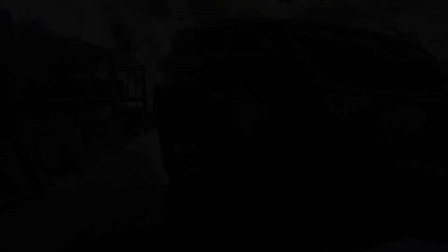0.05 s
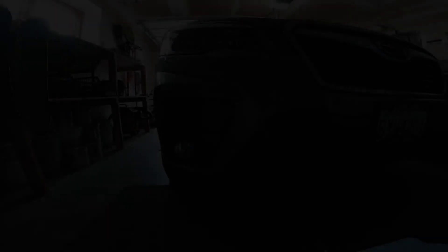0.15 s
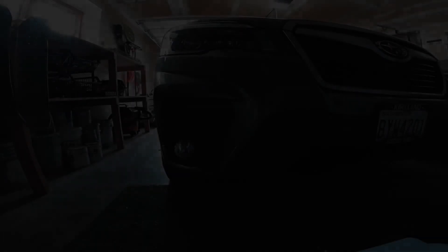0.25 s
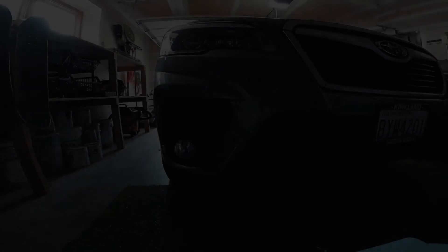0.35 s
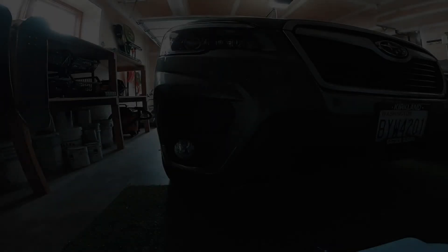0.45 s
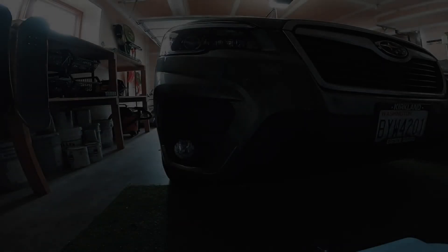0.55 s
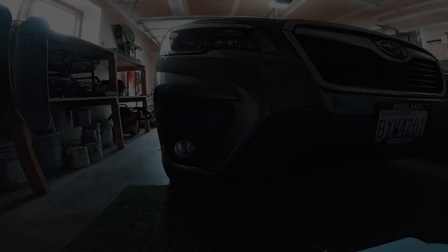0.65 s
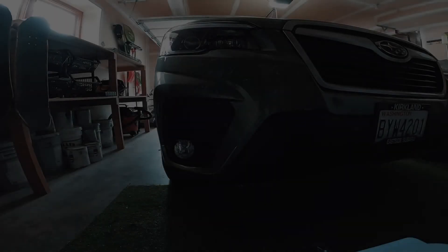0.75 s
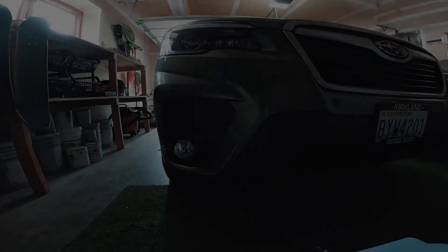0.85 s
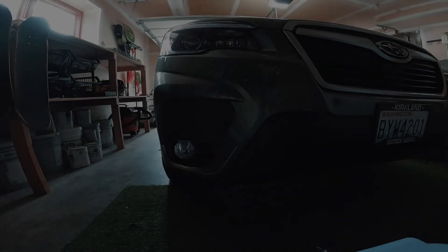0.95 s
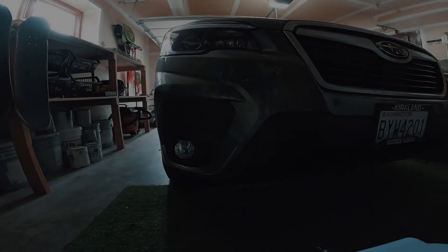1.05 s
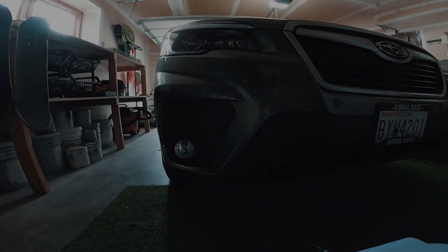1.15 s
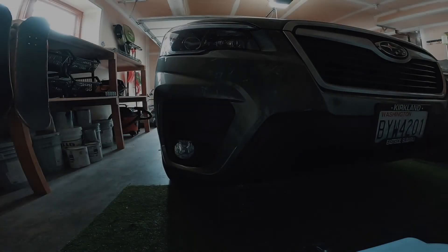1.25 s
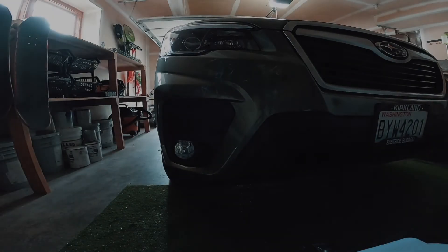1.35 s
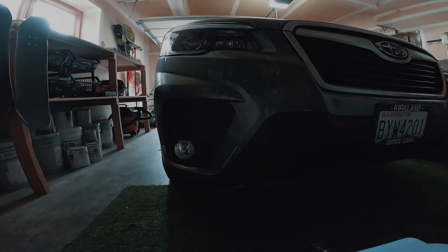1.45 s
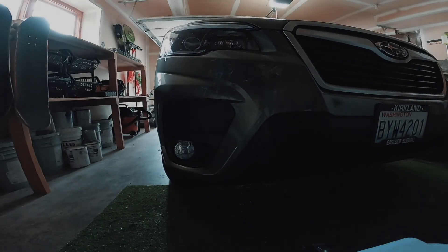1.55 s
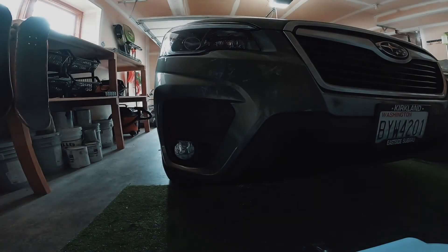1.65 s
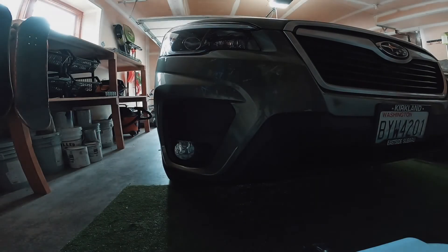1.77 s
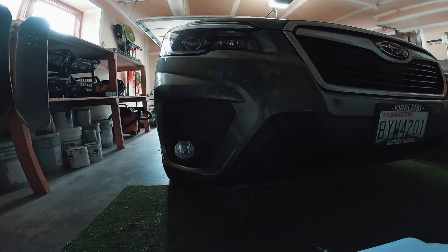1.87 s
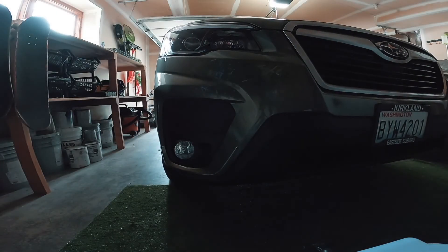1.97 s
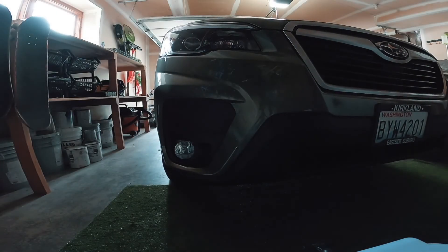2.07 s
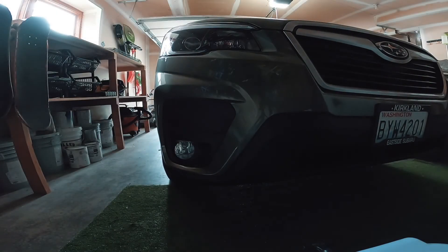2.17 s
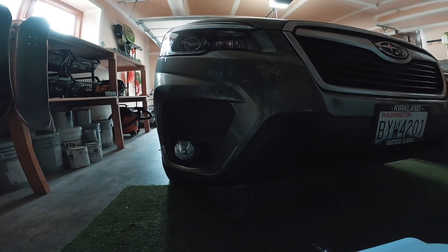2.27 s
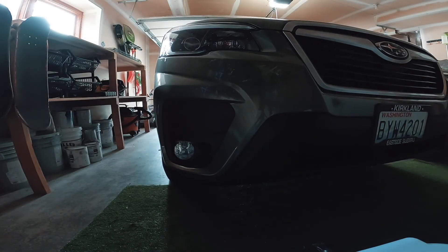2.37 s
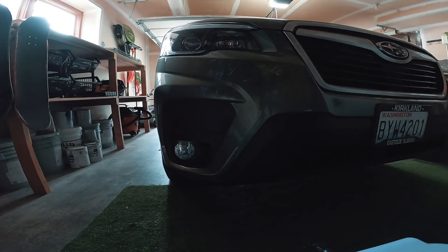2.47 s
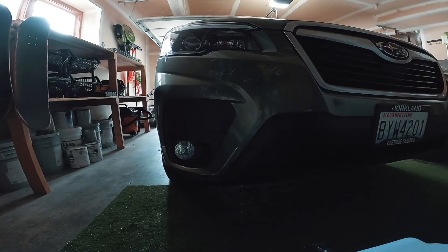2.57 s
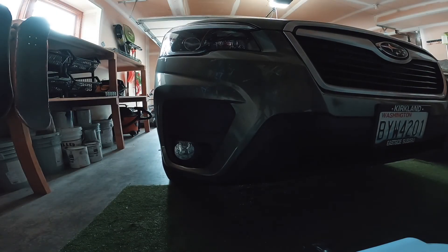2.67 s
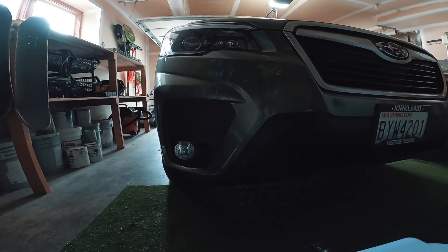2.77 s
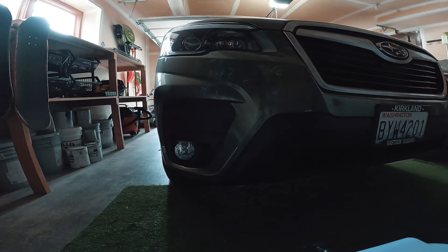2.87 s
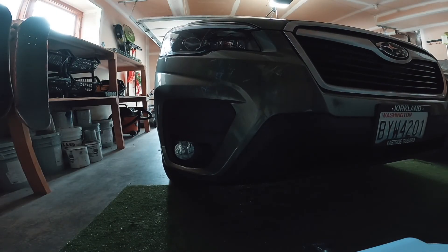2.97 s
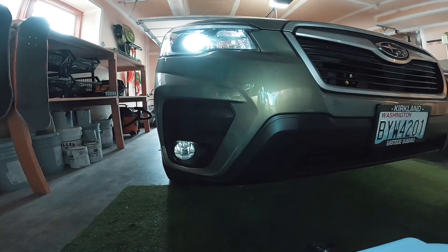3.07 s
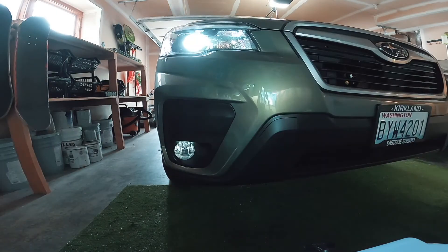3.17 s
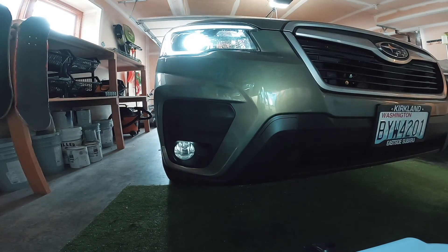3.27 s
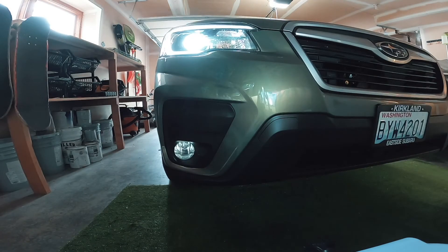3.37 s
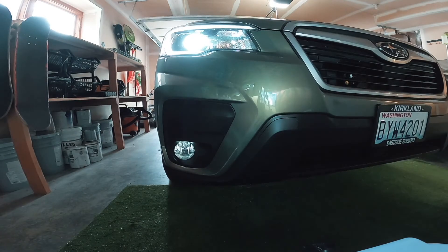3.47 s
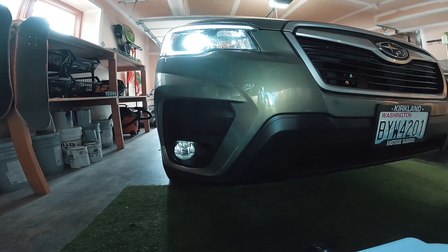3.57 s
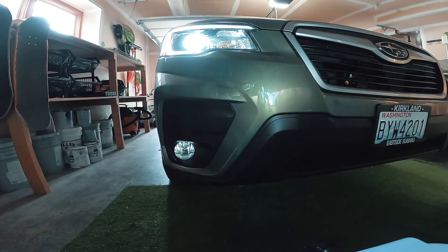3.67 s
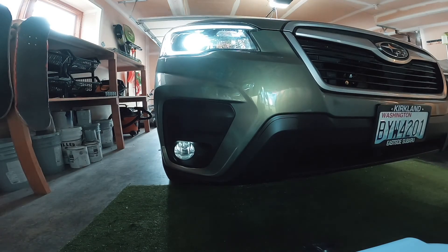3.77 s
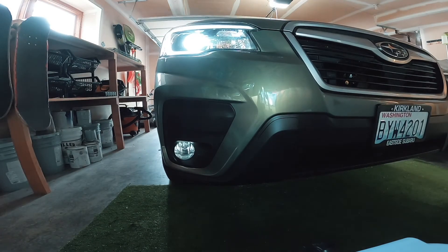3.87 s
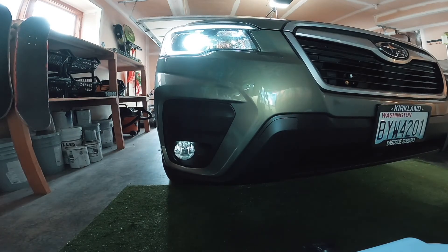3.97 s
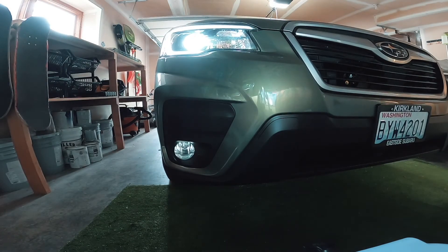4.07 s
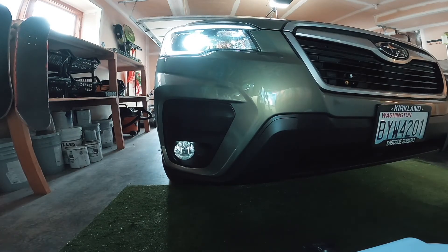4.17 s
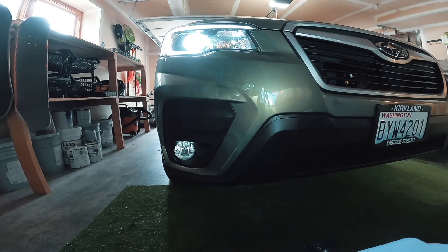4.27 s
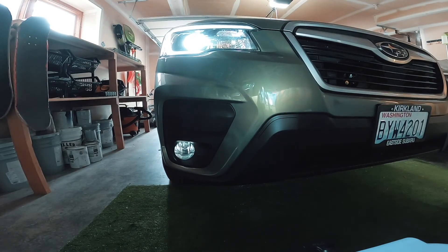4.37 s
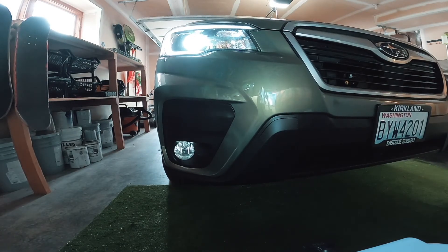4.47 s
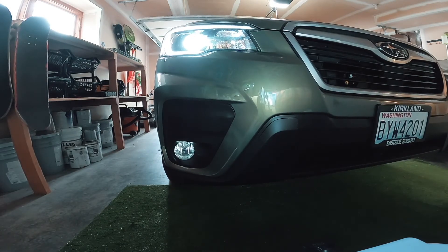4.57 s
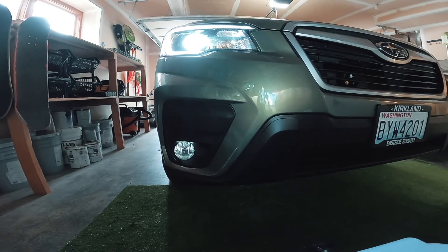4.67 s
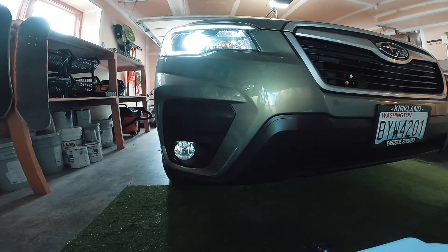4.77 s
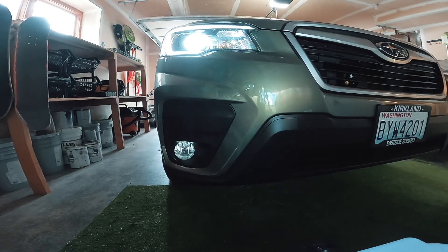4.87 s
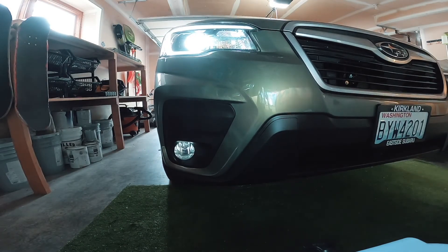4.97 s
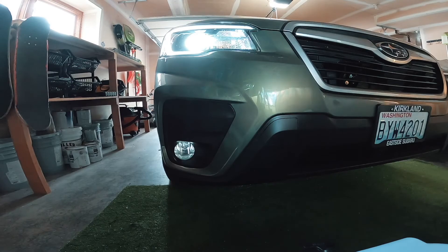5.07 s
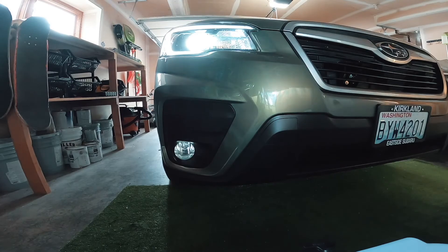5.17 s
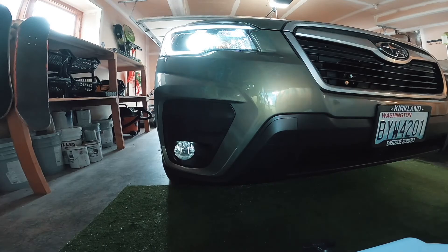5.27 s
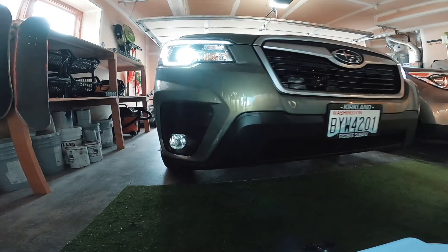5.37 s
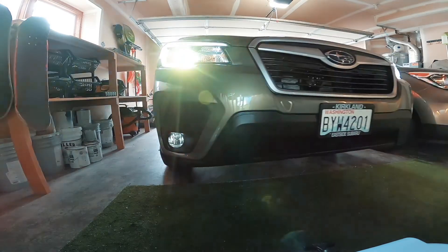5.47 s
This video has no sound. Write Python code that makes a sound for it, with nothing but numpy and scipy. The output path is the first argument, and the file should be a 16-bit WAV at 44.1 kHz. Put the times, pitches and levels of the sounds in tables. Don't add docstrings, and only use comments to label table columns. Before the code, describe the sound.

Small hard-walled garage, stereo microphone low by the bumper. Quiet rumble rises from silence; a door clunks open, seat knocks and deep body thumps follow, then a booming door slam. After a pause, ticking relays and a faint servo buzz, four grinding starter heaves, an engine roaring up and settling, and a sudden change to a low idle throb.

```python
import sys
import numpy as np
from scipy import signal
from scipy.fft import rfft, irfft, next_fast_len
from scipy.io import wavfile
from scipy.ndimage import uniform_filter1d

SR = 44100
rng = np.random.default_rng(int(sys.argv[2]) if len(sys.argv) > 2 else 0)


def put_to_file(sound):
    columns = np.atleast_2d(sound).T
    safe = np.clip(columns, -1, 1)
    whole_steps = np.round(safe * 32767)
    wavfile.write(sys.argv[1], SR, whole_steps.astype(np.int16))


def volts_from_decibels(level):
    exponent = np.asarray(level, float) / 20
    return 10 ** exponent


N = 243873
T = np.arange(N) / SR


def unit(x):
    return x / np.sqrt(np.mean(x ** 2))


def levelled(x, samples):
    return x / np.sqrt(uniform_filter1d(x ** 2, size=samples))


def colour(x, points, scale=1):
    hz, db = np.transpose(points)
    size = next_fast_len(len(x) + SR // 4, real=True)
    f = np.maximum(np.arange(size // 2 + 1) * SR / size, 1)
    gain = volts_from_decibels(scale * np.interp(np.log(f), np.log(hz), db))
    return irfft(rfft(x, size) * gain, size)[:len(x)]


def white():
    return rng.standard_normal(N)


def noise(points):
    return unit(colour(white(), points))


def band(x, hz, kind):
    return signal.sosfilt(signal.butter(3, hz, kind, fs=SR, output="sos"), x)


def treble(x, hz):
    return band(x, hz, "high")


def ring(x, hz, width_hz):
    return signal.lfilter(*signal.iirpeak(hz, hz / max(width_hz, 2), SR), x)


def body(x, peaks):
    return sum((-1) ** k * volts_from_decibels(db) * ring(x, hz, w) for k, (hz, w, db) in enumerate(peaks))


def walk(rate):
    k = int(SR / rate)
    steps = np.repeat(rng.standard_normal(N // k + 1), k)
    return 1.293 * uniform_filter1d(uniform_filter1d(steps, k), k)[:N]


def tone(hz):
    return np.sqrt(2) * np.sin(2 * np.pi * np.cumsum(hz * np.ones(N)) / SR)


def blow(s, length_s, rise_s=0.0013):
    t = np.maximum(T - s, 0)
    return (1 - np.exp(-t / rise_s)) * np.exp(-t / max(length_s, 1e-4)) + 1e-12


def swell(s, db, rise, fall):
    return db - np.where(T < s, rise * (s - T), fall * (T - s))


def loudest(rows):
    return np.max([swell(*row) for row in rows], axis=0)


def running(start_s, stop_s):
    return uniform_filter1d(((T > start_s) & (T < stop_s)) * 1., size=200)


def garage(x, t60_s, wet_db):
    t = T[:SR // 2]
    decay = np.exp(-np.log(1000) * t / t60_s)
    tail = unit(rng.standard_normal(len(t)) * decay) / np.sqrt(len(t)) * volts_from_decibels(wet_db)
    tail[0] = 1
    return signal.fftconvolve(x, tail)[:N] / np.sqrt(1 + volts_from_decibels(wet_db) ** 2)


# (frequency [Hz], density [dB per Hz])
RUMBLE = [(12, -44.5), (20, -42), (37, -6), (58, -11.5), (81, -2.5), (114, -1.5), (151, -12), (247, -12),
          (364, -27.5), (490, -32.5), (700, -51), (910, -74.5), (1540, -120)]
# (frequency [Hz], density [dB per Hz])
HISS = [(290, -21), (500, -4), (627, -9.5), (829, -14.5), (1030, -3), (1070, -6), (1370, -11), (2670, -19),
        (5190, -23.5), (8380, -30.5), (12000, -66), (15600, -85), (22000, -120)]
# (time [s], rumble level [dB])
GAIN = [(0.05, -91), (0.2, -72), (0.4, -61), (0.75, -54.5), (1.06, -53), (1.25, -47), (1.72, -42),
        (2.45, -43.5), (2.58, -50), (3.06, -52.5), (3.1, -45), (3.9, -44.5)]
# (peak time [s], level beside rumble [dB], rise [dB/s], fall [dB/s])
RUSTLES = [
    (.74, -17, 150, 60),
    (0.915, -11, 70, 80),
    (1.61, -20, 121, 70),
    (2.38, -17.5, 100, 130),
    (3.33, -18, 41, 38),
]


def air():
    gain_db = np.interp(T, *np.transpose(GAIN))
    rumble = noise(RUMBLE) * volts_from_decibels(gain_db + 3.25 * walk(7.08) + 1.5)
    hum = tone(51.9 * (1 + 0.0068 * walk(4.42))) * volts_from_decibels(gain_db + 1 + 3.2 * walk(16))
    hiss = noise(HISS)
    rustle = volts_from_decibels(gain_db + loudest(RUSTLES)) * (.25 * hiss + 1.7 * ring(hiss, 1400, 600))
    hiss = hiss * volts_from_decibels(gain_db - 28.5) + rustle
    return (T > .06) * (rumble + hiss * volts_from_decibels(0.88 * walk(6.6) + 3.0) + hum)


# (peak time [s], pitch [Hz], boom level [dB], boom fall [dB/s], panel thud level [dB])
LOADS = [(1.052, 36.09, -24.5, 3, -20.5), (1.24, 38.94, -27, 68, -38.5), (1.58, 35.84, -29.5, 49, -23),
         (1.65, 36.8, -21.5, 280, -33), (1.76, 39.9, -28, 36, -29), (2.04, 40, -36.5, 81, -35),
         (2.2, 40.95, -39.5, 300, -31.5), (2.359, 30.1, -12.5, 300, -9), (2.42, 29.3, -16, 97, -14.5),
         (2.68, 28.3, -35, 150, -48), (2.85, 24, -44, 100, -49)]
# (frequency [Hz], width [Hz], gain [dB])
PANELS = [(54.5, 15, -2.5), (101, 24.7, -3.5), (130, 21.5, -6.5), (155, 37, -17.5)]
# (peak time [s], level [dB], rise [dB/s], fall [dB/s])
CABIN = [(2.43, -21, 130, 130)]


def boom():
    load_rise, choke_s = 397.5, 0.059
    s, hz, peak_db, fall, thud_db = np.transpose(LOADS)
    chokes = np.append(s[1:] - choke_s, T[-1])
    swings = [swell(a, p, load_rise, f) - load_rise * np.maximum(T - c, 0)
              for a, p, f, c in zip(s, peak_db, fall, chokes)]
    boom_db = np.max(swings, axis=0)
    hz = uniform_filter1d(hz[np.searchsorted(chokes[:-1], T)], size=3000)
    thud_db = loudest([(a, p, 547.5, 119) for a, p in zip(s, thud_db)])
    thud = levelled(unit(body(white(), PANELS)), 2500)
    cabin = tone(55.4) * volts_from_decibels(loudest(CABIN))
    return tone(hz) * volts_from_decibels(boom_db) + thud * volts_from_decibels(thud_db - 5.0) + cabin


# (time [s], peak level [dB], brightness [dB], depth [dB], panel pitch [Hz])
KNOCKS = [(1.028, -28, -7, 3.5, 202), (1.042, -42, -27, 4.5, 240), (1.058, -38, -12, 0, 245),
          (1.074, -38, -9, 4.5, 245), (1.381, -58.5, -9, 3, 283), (1.512, -61.5, -1.5, 0, 235),
          (1.56, -35, -5, -1.5, 219), (1.585, -38, -6, -6, 300), (1.598, -35, -10, -13, 307),
          (1.625, -43, -8, -6, 300), (1.735, -42.5, -16, -6, 460), (1.747, -44, -21, 12, 300),
          (1.99, -50.5, -13.5, 13.5, 213), (2.004, -50, -11, 10.5, 400), (2.03, -57.5, -8, 13.5, 236),
          (2.2, -43.5, -17, 6, 223), (2.29, -40, -24, -9, 202), (2.296, -28, -19, -22, 237),
          (2.302, -22, -21, -26, 300), (2.313, -29, -18, -14, 300), (2.323, -15.5, -19, -3, 400),
          (2.336, -22, -15, -5, 420), (2.349, -22, -15, 4, 440), (2.385, -31, -14, 2, 250)]
# (frequency [Hz], density [dB per Hz])
DOOR = [(88, -40.5), (150, 10.5), (185, -27), (260, 3), (303, -13), (434, -5), (588, -20), (767, -20),
        (910, -16.5), (1280, -23.5), (1640, -25.5), (4400, -41.5), (8390, -57.5), (14000, -83.5)]
# (frequency [Hz], width [Hz], gain [dB])
SHELL = [(54.6, 7.1, 2.5), (111.5, 23, -2.5), (134.6, 13, -0.5), (240, 23, -7), (291, 22, -13.5),
         (465.6, 26, -12)]
# (time [s], peak level [dB], half width [s])
LATCH = (2.329, -9.5, .002)


def door():
    metal, rattle, shoves = noise(DOOR), np.zeros((3, N)), np.zeros(N)
    deep = unit(band(metal, 423, "low"))
    bright = unit(treble(metal, 2440))
    middle = unit(band(treble(metal, 552), 2130, "low"))
    middle = unit(middle + .6 * ring(middle, 1170, 300))
    for k, (s, db, bright_db, depth_db, hz) in enumerate(KNOCKS):
        panel = 0.63 * deep + 0.96 * ring(deep, hz, 110)
        sound = middle + panel * volts_from_decibels(depth_db) + bright * volts_from_decibels(bright_db + 2.0)
        rattle[k % 3] += volts_from_decibels(db + 4) * blow(s + 0.0029, 0.0092, 0.0046) * sound
        shoves[int((s + .0035) * SR)] = volts_from_decibels(db + depth_db + 49)
    echoes = sum(garage(part, 0.36, 3.8) for part in rattle)
    shell = body(band(shoves + 1e-12 * metal, 700, "low"), SHELL)
    latch_s, latch_db, half_width_s = LATCH
    return echoes + shell + volts_from_decibels(latch_db) * np.exp(-np.abs(T - latch_s) / half_width_s)


# (time [s], peak level [dB], ring pitch [Hz], brightness [dB])
RELAYS = [(3.077, -47, 1100, -14), (3.083, -62, 4650, -25), (3.08, -49, 1350, -25), (3.132, -46.5, 1260, 2),
          (3.145, -51, 1370, -10), (3.137, -52, 3000, -20), (3.16, -53.5, 2880, -20),
          (3.178, -52, 1800, -25), (3.175, -50, 1270, -36), (3.192, -50, 1300, -30),
          (3.216, -48.5, 3300, -24), (3.225, -50, 1150, -25), (3.27, -54, 3200, -25),
          (3.246, -41, 1240, -24), (3.275, -51, 1000, -20), (3.312, -44.5, 1300, 0.5),
          (3.323, -38, 1340, -12), (3.34, -49, 2300, -20), (3.365, -38, 1440, -9), (3.371, -38, 1480, -22),
          (3.368, -46, 2800, -22), (3.37, -55, 4500, -20), (3.386, -39.5, 1000, -14),
          (3.398, -48, 2300, -20), (3.41, -47, 1000, -44)]


def relays():
    out, hiss = 0, white()
    for s, db, hz, bright_db in RELAYS:
        snap = hiss * blow(s, 0.0059, 0.0023)
        armature, box = 5.2 * ring(snap, hz, hz / 9), 1.4 * ring(snap, 1030, 1350)
        out = out + volts_from_decibels(db + 3.0) * (armature + box + volts_from_decibels(bright_db) * treble(snap, 3800))
    return band(out, 5500, "low")


# (peak time [s], level [dB], rise [dB/s], fall [dB/s])
SPIN_UP = [(3.43, -52, 480, 150), (3.51, -55, 50, 300), (3.452, -51, 300, 215)]
# (peak time [s], level [dB], rise [dB/s], fall [dB/s])
SETTLE = [(3.5, -59, 110, 60)]


def servos():
    coil_hz, coil_db = 1000, -65.5
    db, third_db = loudest(SPIN_UP), loudest(SETTLE)
    hiss = white()
    upper = ring(hiss, 2290, 200) + .3 * ring(hiss, 4430, 80)
    upper = upper + .15 * ring(hiss, 3850, 60) + .1 * ring(hiss, 5580, 60)
    upper = volts_from_decibels(db - 4.5) * unit(upper)
    third = volts_from_decibels(third_db - 2.5) * unit(ring(hiss, 3303, 14) + 0.52 * ring(hiss, 3410, 40))
    squeal = volts_from_decibels(db - 24) * unit(ring(hiss, 7900, 90) + .7 * ring(hiss, 9200, 120))
    buzz = volts_from_decibels(coil_db - 5.5) * unit(band(treble(hiss, 1500), 4800, "low"))
    coil = volts_from_decibels(coil_db) * (tone(coil_hz) + volts_from_decibels(-17) * tone(2 * coil_hz))
    motor = volts_from_decibels(db - 6.0) * tone(1095) + band(upper + third, 6500, "low") + squeal
    return running(3.4, 3.895) * (motor + buzz + coil)


# (centre time [s], length [s], pitch
# [Hz], level [dB])
WHINES = [(3.917, 0.022, 1440, -30), (3.935, 0.034, 1310, -26), (3.955, 0.031, 1180, -30),
          (3.94, 0.029, 950, -29.5), (3.93, 0.015, 3220, -28.5), (3.995, 0.052, 2510, -32),
          (4.015, 0.051, 280, -32.5), (4.01, 0.04, 980, -32.5), (3.997, 0.062, 495, -34.5),
          (4.097, 0.1, 2730, -36.5), (4.12, 0.07, 495, -34), (4.153, 0.0695, 970, -31),
          (4.18, 0.03, 1000, -36), (4.16, 0.035, 1370, -39), (4.085, .06, 1010, -37),
          (4.17, 0.047, 2480, -35), (4.18, 0.06, 3090, -40), (4.06, .04, 3260, -42),
          (4.19, 0.039, 2310, -38.5), (4.197, 0.04, 454, -34.5), (4.296, 0.02, 965, -28.5),
          (4.3, .03, 2465, -36), (4.3, 0.022, 2700, -39.5), (4.355, 0.039, 1170, -36.5),
          (4.34, .04, 2600, -40.5), (4.32, 0.025, 990, -28), (4.29, 0.015, 1720, -35),
          (4.303, 0.025, 2030, -34), (4.286, 0.015, 480, -33.5), (4.44, 0.0365, 480, -27),
          (4.06, .07, 480, -36), (4.465, 0.0405, 1005, -35), (4.485, 0.025, 3100, -37),
          (4.46, 0.04, 1300, -39), (4.5, .03, 3975, -36), (4.54, 0.036, 1830, -36),
          (4.545, 0.048, 2970, -35.5), (4.61, 0.04, 3250, -37), (4.58, .03, 2070, -34.5),
          (4.6, .06, 2900, -37.5), (4.62, .03, 912, -38), (4.435, .02, 900, -29), (4.427, .015, 2950, -33),
          (4.63, .03, 400, -33),
          (4.097, .04, 5570, -35), (4.1, .04, 6950, -42), (4.45, .02, 5570, -39), (4.607, .02, 8200, -43),
           (4.06, .015, 4800, -36), (4.06, .02, 5660, -41), (4.083, .015, 4200, -39),
           (4.11, .02, 4280, -42), (4.135, .02, 4150, -40), (4.155, .03, 5620, -43), (4.06, .02, 7950, -46),
           (4.09, .025, 7900, -45), (4.13, .03, 7850, -44), (4.11, .05, 8330, -47),
           (3.978, .015, 8220, -42), (3.96, .015, 4200, -37), (4.125, .015, 5500, -40),
           (4.135, .015, 6900, -44)]


def whines():
    out = np.zeros(N)
    wobble_s = np.cumsum(1 + 0.00621 * walk(90)) / SR
    flutter = volts_from_decibels(4.2 * walk(109.7))
    for s, length, hz, db in WHINES:
        at = slice(int((s - 2 * length) * SR), int((s + 2 * length) * SR))
        own_flutter = flutter[int(hz * 9):][:len(T[at])]
        dull_db = -2.5 * max(np.log2(hz / 1500), 0)
        envelope = volts_from_decibels(db + dull_db) * own_flutter * np.exp(-(2 * (T[at] - s) / length) ** 2)
        out[at] += envelope * np.sin(2 * np.pi * hz * wobble_s[at])
    return 1.36 * out


# (peak time [s], clatter level [dB], rise [dB/s], fall [dB/s], brush whistle level [dB])
STROKES = [
    (3.919, -23, 950, 38.5, -50),
    (4.175, -26, 70, 142, -49),
    (4.301, -19.5, 804, 149, -38.5),
    (4.435, -21, 720, 114, -43.5),
    (4.61, -26.5, 140, 60, -70),
]
# (frequency [Hz], width [Hz], gain [dB])
GEARS = [(251, 100, 1), (464, 36, 0.5), (898, 48, -5), (1314, 13, -3), (2010, 33, -7), (2530, 98, -27),
         (2800, 11, -21), (2910, 91, -14)]
# (frequency [Hz], density [dB per Hz])
HOUSING = [(88, -48), (150, -21.5), (242, 0), (341, -6.5), (473, -7), (606, -13), (978, -5), (1610, -10.5),
           (3080, -10), (4600, -18), (5570, -19.5), (7420, -28.5), (8170, -24), (8990, -30.5), (14500, -57)]
# (time [s], peak level [dB], length [s], ring pitch [Hz])
KICKS = [(3.913, -11, 0.02, 1410), (3.939, -17, 0.021, 1170), (4.286, -13, 0.012, 950),
         (4.323, -24, 0.03, 985), (4.424, -12, 0.016, 890), (4.534, -19.5, 0.046, 2880),
         (4.616, -16.5, 0.018, 1430)]
# (peak time [s], level [dB], rise [dB/s], fall [dB/s])
HEAVE = [(3.91, -34.5, 900, 43), (4.204, -34, 140, 87), (4.356, -32, 138, 50), (4.56, -23.5, 280, 60),
         (4.66, -30, 62, 220)]
# (peak time [s], level [dB], rise [dB/s], fall [dB/s])
RASP = [(4.605, -29, 80, 300), (4.485, -34, 150, 250), (3.93, -33, 900, 55)]
# (peak time [s], level [dB], rise [dB/s], fall [dB/s])
ENGAGE_HISS = (3.925, -58, 900, 200)


def starter():
    db = loudest([row[:4] for row in STROKES])
    holds = [np.minimum(swell(s, w + 8.5, 2.2 * up, 2.2 * down), w) for s, _, up, down, w in STROKES]
    whistle = volts_from_decibels(np.max(holds, axis=0) - 5.5 + 3.5 * walk(40)) * tone(8206)
    teeth = band(white() * volts_from_decibels(3 * walk(400)), 5000, "low")
    rings = sum(volts_from_decibels(g + 5 * walk(18)) * ring(teeth, f, w) for f, w, g in GEARS)
    shell = noise(HOUSING)
    clatter = volts_from_decibels(-8.5) * unit(rings) + volts_from_decibels(-2.5) * unit(band(shell, 2510, "low"))
    bright = volts_from_decibels(-30 + 0.49 * (db - db.max())) * unit(treble(shell, 2250))
    slam = noise(HOUSING)
    kicks = sum(volts_from_decibels(p - 9.5) * blow(s, length) * (slam + 1.13 * ring(slam, f, 340))
                for s, p, length, f in KICKS)
    heave = unit(band(ring(white(), 33.5, 67), 91, "low")) * volts_from_decibels(loudest(HEAVE) - 2)
    rasp = volts_from_decibels(loudest(RASP)) * unit(treble(slam, 3600))
    engaging = volts_from_decibels(swell(*ENGAGE_HISS)) * unit(treble(white(), 10500))
    turning = running(3.903, 4.66) * (volts_from_decibels(db - 1.5) * clatter + bright + whistle)
    return turning + whines() + kicks + heave + rasp + engaging


# (time [s], firing rate [Hz])
FLARE = [(4.53, 21), (4.585, 22.5), (4.625, 28), (4.655, 35.5), (4.682, 40.5), (4.708, 45.83), (4.8, 55.98),
         (4.902, 63.09), (5.022, 62.32), (5.118, 60.53), (5.33, 59.08)]
# (frequency [Hz], width [Hz], gain [dB])
INTAKE = [(267, 66, -3), (340, 28.1, -4), (497, 42, -6)]
CYLINDER_DB = [-3, -1, -4, 3.5]
# (frequency [Hz], density [dB per Hz])
BLOCK = [(190, -4.5), (260, -1.5), (330, -2.5), (400, -5), (500, -4), (620, -10.5), (830, -12.5), (932, -6),
         (1110, -14), (1350, -9), (1680, -15.5), (1850, -12.5), (4460, -21.5), (8860, -34), (12800, -46),
         (15000, -59)]
# (peak time [s], level [dB], rise [dB/s], fall [dB/s])
SURGES = [(4.56, -22, 597.5, 160), (4.665, -15.5, 170, 60), (4.75, -20.5, 42, 400), (4.85, -26.5, 110, 5),
          (5.22, -25, 23, 12)]
# (multiple of firing rate, peak time [s], level [dB], rise [dB/s], fall [dB/s])
BOXER = [(.5, 5.09, -28, 150, 150), (1.5, 5.2, -39, 5, 5), (2., 4.71, -26, 60, 220),
         (2., 4.97, -38, 20, 15), (3., 4.68, -33, 80, 90), (4., 5.15, -36, 10, 20),
         (4.25, 4.93, -32, 70, 45), (4.5, 4.82, -35, 150, 25), (5.5, 4.705, -27, 250, 250),
         (11.2, 4.71, -31, 300, 300), (9.4, 4.755, -31, 200, 300), (13, 4.67, -34, 300, 300),
         (4, 4.6, -27, 200, 200), (4.5, 5.18, -29.5, 20, 12), (4.75, 5.0, -32, 110, 90),
         (5., 4.88, -34, 90, 40), (5., 5.27, -24, 35, 10), (5.75, 5.27, -33, 40, 10),
         (8., 4.9, -37, 30, 10), (15.2, 4.96, -34, 200, 200), (15.6, 5.07, -35, 150, 12),
         (23., 4.97, -40, 40, 12), (30., 5.17, -41, 50, 40), (50., 5.25, -41, 150, 150)]


def flare():
    hz = np.interp(T, *np.transpose(FLARE))
    turns = np.cumsum(hz) / SR
    firing_at = np.flatnonzero(np.diff(np.floor(turns)))
    firing_db = np.array(CYLINDER_DB)[np.arange(len(firing_at)) % 4]
    pulses = np.zeros(N)
    pulses[firing_at] = volts_from_decibels(firing_db + 0.5 * rng.standard_normal(len(firing_at)))
    pulses = pulses + 1e-12 * np.sin(T * SR)
    drone = levelled(body(band(pulses, 2500, "low"), INTAKE), 6000)
    drone_db = np.maximum(-24.5 - 1.3 * np.maximum(47 - hz, 0), -46)
    drone = volts_from_decibels(-13.0) * treble(drone, 165) * volts_from_decibels(drone_db - 5.5)
    cycle = 2 * np.pi * (turns - turns[int(5.279 * SR)])
    growl = sum(volts_from_decibels(swell(*row) + 2 + 1.3 * walk(14)) * np.cos(k * cycle + 0.33 * walk(9))
                for k, *row in BOXER)
    gear = noise(BLOCK)
    gear = gear + treble(gear, 8500) * (volts_from_decibels(1.2 * walk(35)) - 1)
    puff = 1 + .18 * np.cos(2 * np.pi * turns)
    gear = gear * puff * volts_from_decibels(0.45 * walk(30) + .8 * walk(500))
    gear = gear * volts_from_decibels(-26.5 - 0.11 * np.maximum(49.5 - hz, 0) + 1.5)
    throb = np.cos(2 * np.pi * (turns - turns[int(4.669 * SR)])) * volts_from_decibels(loudest(SURGES) + 3)
    return running(FLARE[0][0], FLARE[-1][0]) * (throb + growl + drone + gear)


# (multiple of idle rate, level [dB])
IDLE = [(1, 6), (2, -22), (3, -4.5), (4, -64), (5, -23), (6, -83), (7, -25), (8, -51), (9, -36), (10, -15)]
# (frequency [Hz], density [dB per Hz])
IDLE_AIR = [(71, -10), (120, -3.5), (191, -13), (298, -10), (387, -24), (484, -16), (682, -22.5),
            (1200, -19.5), (1590, -20.5), (4370, -24.5), (8690, -38), (12500, -49), (15000, -60)]


def idle():
    angle = 2 * np.pi * 28.96 * (T - 5.447)
    throb = sum(volts_from_decibels(db) * np.cos(k * angle - (k + 1) % 2 * np.pi / 2) for k, db in IDLE)
    return unit(throb) * volts_from_decibels(-21.5) + noise(IDLE_AIR) * volts_from_decibels(-34)


# (frequency [Hz], side minus mid [dB])
WIDTH = [(25, -18), (60, -24), (110, -24.5), (200, -17.5), (380, -12.5), (700, -5.5), (1290, -4),
         (2380, -0.5), (4400, 2.5), (8120, 4), (15000, 7.5)]
# (frequency [Hz], gain [dB])
LAG_FADES = [(100, 0), (2200, 0), (7000, -14), (20000, -20)]


def diffuse(x):
    port_lag_s = 4.6e-5
    t = T[:SR // 8]
    smears = rng.standard_normal((2, len(t))) * np.exp(-t / 0.024)
    turn = 2 * np.pi * np.cumsum(3 + 2 * walk(5)) / SR
    smeared = sum(share * signal.fftconvolve(x, smear / np.linalg.norm(smear))[:N]
                  for share, smear in zip((np.cos(turn), np.sin(turn)), smears))
    lag = colour(np.gradient(x), LAG_FADES) * SR * port_lag_s / 2
    side = colour(smeared, WIDTH) * volts_from_decibels(-5.5) - lag
    return np.array([x + side, x - side])


def flicker(x):
    f, t, z = signal.stft(x, SR, nperseg=1024)
    bands = rng.standard_normal((len(f) // 16 + 1, len(t) // 3 + 1))
    bands = np.repeat(bands, 16, axis=0)[:len(f)]
    lines = rng.standard_normal(bands.shape)
    db = 9 * np.minimum(bands + .6, 0) ** 3 + 4.5 * lines - 1.5
    db = np.repeat(db, 3, axis=1)[:, :len(t)]
    return signal.istft(z * volts_from_decibels(db * (f > 10200)[:, None]), SR, nperseg=1024)[1][:, :N]


# (time [s], level [dB], recovery [s], left minus right [dB])
SNAPS = [(3.0746, -32.5, .0016, 0), (5.3389, -17, .0002, -5)]


def scene():
    later = np.clip((T - 5.328) / 0.0027 + .5, 0, 1)
    ducked = volts_from_decibels(-8 * np.clip((T - 3.91) / 0.071, 0, 1))
    before = ducked * air() + boom() + door() + garage(relays(), 0.2, -1)
    before = before + servos() + starter() + flare()
    snaps = -sum(volts_from_decibels(db + np.array([[lean], [0]])) * blow(s, back_s, 1e-5)
                 for s, db, back_s, lean in SNAPS)
    return flicker(diffuse((1 - later) * before + later * idle())) + snaps


def low_pass(x):
    return signal.sosfilt(signal.butter(12, 15710, fs=SR, output="sos"), x)


# (frequency [Hz], left minus right [dB])
LEAN = [(60, 1), (110, 0.0), (200, -1), (380, -0.5), (700, 1), (1290, 0.5), (2380, 2), (4400, 0.5),
        (8120, -4.5), (15000, 1.5)]


def record(dry):
    left = colour(np.tanh(dry[0] / 0.81) * 0.78, LEAN, 0.45)
    right = colour(np.tanh(dry[1] / 0.74) * 0.83, LEAN, -0.5)
    return low_pass(np.array([left, right]))


dry = scene()
out = record(dry)
put_to_file(out)
```